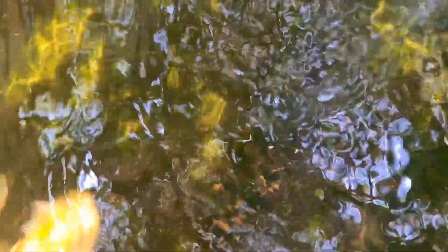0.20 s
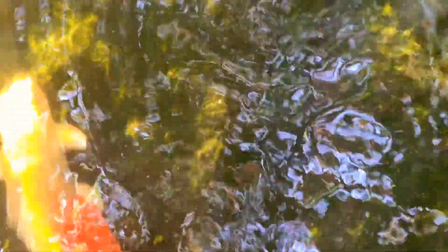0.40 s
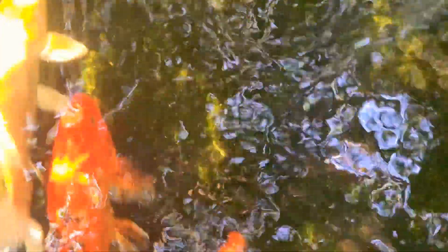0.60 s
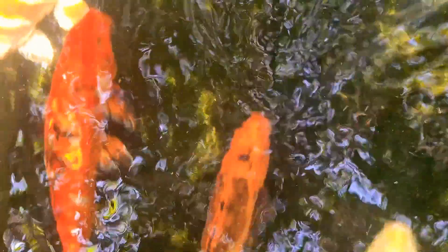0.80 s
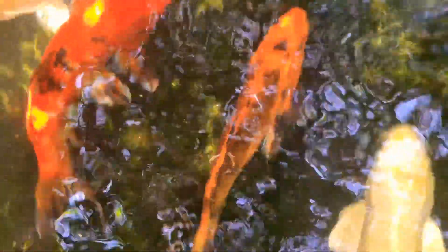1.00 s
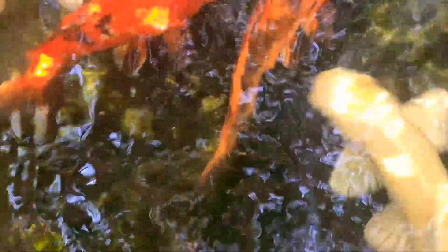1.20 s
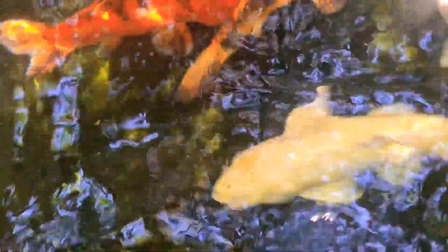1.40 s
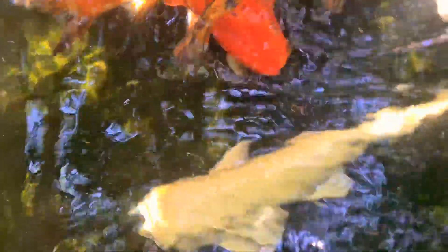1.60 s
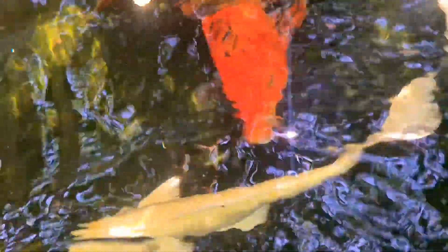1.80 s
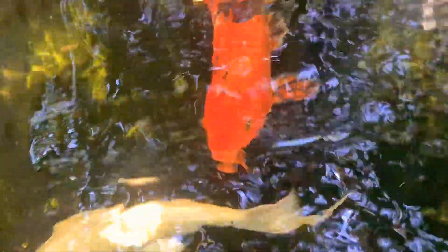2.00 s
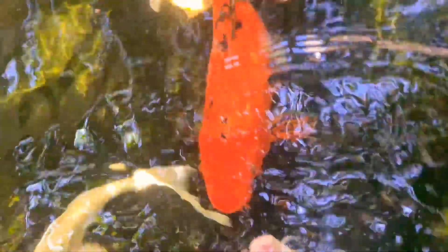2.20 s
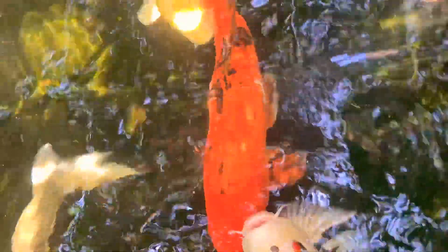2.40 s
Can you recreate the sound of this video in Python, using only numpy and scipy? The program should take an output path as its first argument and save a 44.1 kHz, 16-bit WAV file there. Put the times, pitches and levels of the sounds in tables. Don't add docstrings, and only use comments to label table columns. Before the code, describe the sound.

Feeding fish break a pond surface with a sharp burst of gulps, slaps and froth in the first half second, then soft drips, plinks and fizzing spits over a faint trickle, outdoors, close stereo microphones.

```python
import sys
import numpy as np
from scipy import signal
from scipy.fft import rfft, irfft
from scipy.io import wavfile

SR = 44100
rng = np.random.default_rng(int(sys.argv[2]) if len(sys.argv) > 2 else 0)


def wav_record(signal):
    frames = np.transpose(np.atleast_2d(signal))
    bounded = np.clip(frames, -1, 1)
    quanta = np.round(bounded * 32767).astype(np.int16)
    wavfile.write(sys.argv[1], SR, quanta)


def to_linear_factor(level_db):
    exponent = np.asarray(level_db, float) / 20
    return 10 ** exponent


N = 110250

FAR_LAG_S = 12.0 / 44100
GULP_WOBBLE_DB, GRAIN_DB = 1.3, 2.3


def rms_one(x):
    return x / np.sqrt(np.mean(x ** 2) + 1e-20)


def at_hz(points, hz):
    points = np.array(points)
    return np.interp(np.log(hz), np.log(points[:, 0] + 1e-9), points[:, 1])


def drift(rate_hz):
    r = np.exp(-2 * np.pi * rate_hz * 40 / SR)
    white = rng.standard_normal(N // 40 + 2002)
    slow = rms_one(signal.lfilter([1], [1, -2 * r, r * r], white)[2000:])
    return np.interp(np.arange(N) / 40, np.arange(len(slow)), slow)


def colour(x, spectrum):
    hz = np.maximum(np.fft.rfftfreq(N, 1 / SR), 1)
    return irfft(rfft(x) * to_linear_factor(at_hz(spectrum, hz)), N)


def split(x, kind, edge_hz):
    return signal.sosfilt(signal.butter(2, edge_hz, kind, fs=SR, output="sos"), x)


def ring(x, hz, width_hz):
    r, turn = np.exp(-np.pi * width_hz / SR), 2 * np.pi * hz / SR
    return signal.lfilter([0, np.sin(turn)], [1, -2 * r * np.cos(turn), r * r], x + 1e-18)


def ears(x, lag_s, pan_db=0):
    later = np.interp(np.arange(N) - lag_s * SR, np.arange(N), x)
    return np.array([x * to_linear_factor(pan_db), later * to_linear_factor(-pan_db)])


def add(out, start_s, x):
    i = max(int(start_s * SR), 0)
    out[i:i + len(x)] += x[:N - i]


def pocket(length_s, first_hz, last_hz, rise, fall, bend=1):
    u = np.linspace(0, 1, max(int(length_s * SR), 8))
    shape = u ** rise * (1 - u) ** fall
    hz = first_hz * (last_hz / first_hz) ** u ** bend
    return shape / shape.max() * np.sin(2 * np.pi * np.cumsum(hz) / SR)


def bubbles(per_s, low_hz, high_hz, cycles, spread_db):
    sizes = to_linear_factor(spread_db * np.minimum(rng.exponential(1, N), 4)) * rng.choice([-1, 1], N)
    births = sizes * (rng.random(N) < per_s / SR)
    pitch = rng.integers(0, 24, N)
    out = np.zeros(N)
    for k, hz in enumerate(np.geomspace(low_hz, high_hz, num=24)):
        out += ring(births * (pitch == k), hz, 1.6 * hz / cycles)
    return rms_one(out)


def gulps():
    # start_s, length_s, first_hz, last_hz, peak level_db
    gulp_events = [(1.874, 0.017, 640, 1100, -43.5), (0.1182, 0.0052, 1340, 1300, -22),
                   (.1200, 0.0022, 2440, 2900, -28), (0.12, 0.014, 1270, 1500, -36.5),
                   (0.12, 0.016, 900, 1020, -41), (0.1993, 0.037, 760, 798, -24.5),
                   (0.2072, 0.0031, 1200, 1200, -15.5), (0.22, 0.021, 880, 1290, -30.5),
                   (0.21, 0.0051, 1530, 1550, -22.5), (0.24, 0.018, 1380, 2300, -25),
                   (0.258, 0.011, 400, 317, -34.5), (0.3115, 0.0016, 770, 1000, -17),
                   (0.31, 0.01575, 929, 622, -8.5), (0.31, 0.0068, 1700, 1700, -27),
                   (0.33, 0.004, 870, 600, -20.5), (0.331, 0.018, 462, 525, -27),
                   (.337, 0.006, 860, 920, -32), (0.36, 0.022, 223, 166, -39.5),
                   (0.793, 0.053, 287, 324, -50.5), (0.434, 0.018, 690, 680, -38),
                   (0.45, 0.044, 318, 465, -28), (0.462, 0.0297, 633, 1560, -33),
                   (0.4515, 0.01, 1700, 2000, -37), (.484, .022, 1500, 2300, -37.5),
                   (.503, .01, 2280, 2370, -40), (0.489, 0.0274, 760, 1050, -38.5),
                   (.508, .014, 940, 560, -39.5), (.533, 0.032, 440, 690, -40),
                   (0.56, 0.015, 918, 1240, -27), (0.57, 0.023, 1240, 1130, -43),
                   (0.8735, 0.0226, 595, 1100, -35.5), (0.93, 0.032, 680, 1250, -51),
                   (.849, .006, 690, 870, -44), (.858, 0.009, 735, 600, -43),
                   (0.886, 0.013, 1310, 1340, -44.5)]
    out, t = np.zeros(N), np.arange(400) / SR
    white = rng.standard_normal((len(gulp_events), len(t)))
    cracks = signal.lfilter([.4, -.3], [1, -1.5, .6], white) * to_linear_factor(-60 * t / .012)
    for (start_s, length_s, first_hz, last_hz, level_db), crack in zip(gulp_events, cracks):
        add(out, start_s, to_linear_factor(level_db) * pocket(length_s, first_hz, last_hz, .35, 1.4, bend=1.2))
        add(out, start_s + 0.00104, to_linear_factor(level_db - 9) * crack)
    return out * to_linear_factor(GULP_WOBBLE_DB * drift(118))


def thrash():
    # start_s, length_s, level_db
    bouts = [
        (0.091, 0.12, -49.5),
        (0.197, 0.08, -30.5),
        (0.261, 0.19, -46),
        (0.444, 0.083, -46),
        (0.479, 0.051, -40),
        (0.497, 0.22, -50.5),
        (0.784, 0.047, -55.5),
        (0.843, 0.11, -52),
        (2.235, 0.12, -63),
        (2.392, 0.23, -69),
    ]
    effort = np.zeros(N)
    for start_s, length_s, level_db in bouts:
        u = np.linspace(0, 1, int(length_s * SR))
        add(effort, start_s, 2 * to_linear_factor(level_db) * u ** 0.51 * (1 - u) ** 1.31)
    return effort


def churn():
    # pitch_hz, level_db (per Hz)
    froth = [(180, -15), (300, -6), (778, -10.5), (1450, -4.5), (1800, -5), (5000, -13), (6500, -63),
             (11000, -120)]
    fizz = colour(bubbles(4000, 500, 4500, 13.0, GRAIN_DB + .5), froth)
    return thrash() * to_linear_factor(3.5) * rms_one(fizz)


def sprays():
    # start_s, peak level_db, strongest ring pitch_hz, brightness_db
    slaps = [(0.0308, -50.5, 2910, -10), (0.2071, -29.5, 2810, -4), (0.235, -34, 3320, -3.5),
             (0.2422, -35.5, 4210, -5.5), (0.292, -37, 2190, 0.5), (0.3117, -40, 2160, 5.5),
             (0.3279, -33, 4054, -6.5), (0.39, -41.5, 2920, -5), (0.6495, -45, 3390, -2.5),
             (0.7117, -38.5, 2970, -1.5), (0.8335, -63.5, 4800, 12), (0.9235, -45.5, 2910, -0.5),
             (0.9737, -43, 4700, -1), (1.085, -51, 3410, -7.5), (1.1775, -44, 2850, -3.5),
             (1.343, -51.5, 4200, 3.5), (1.3987, -45.5, 4030, 2.5), (1.5664, -41, 3450, -5),
             (1.6593, -42.5, 2540, -1), (1.729, -51.5, 7250, 5.5), (1.8415, -55, 5630, 5),
             (2.041, -49.5, 7930, 5), (2.1038, -43.5, 4920, -0.5), (2.1882, -47, 2950, -2.5),
             (2.2189, -39.5, 11460, 1.5), (2.297, -43, 2360, -5), (2.4619, -48, 2970, -4.5)]
    # pitch_hz, level_db (per Hz)
    hiss_spectrum = [(880, -24), (1500, -12.5), (2000, -10.5), (4080, -11), (5660, -12.5), (11800, -29.5),
                     (16000, -31.5)]
    t60_s, split_hz, shared, churn_hiss_db = 0.12, 4000, 0.093, -10.5
    white = colour(rng.standard_normal((3, N)), hiss_spectrum)
    hiss = shared * ears(white[0], FAR_LAG_S) + (1 - shared) * white[1:]
    hiss = hiss * to_linear_factor(GRAIN_DB * drift(200))
    dull = rms_one(split(hiss, "low", split_hz))
    bright = rms_one(split(hiss, "high", split_hz))

    effort, rings, t = thrash(), np.zeros(N), np.arange(SR // 4) / SR
    low = to_linear_factor(churn_hiss_db) * effort
    high = to_linear_factor(churn_hiss_db - 4) * effort
    for start_s, level_db, hz, bright_db in slaps:
        s = start_s - .001
        shape = to_linear_factor(level_db + 1.5 - 60 * t / t60_s) * np.minimum(t / 0.0023, 1)
        add(low, s, shape * to_linear_factor(-bright_db - 8.5))
        add(high, s, shape * to_linear_factor(bright_db - 7.5))
        bubble = pocket(.012, hz, hz * 0.973, 0.2, 2.2)
        bubble = bubble + 0.58 * pocket(.012, hz * 1.3, hz * 0.88, 0.24, 7.1)
        add(rings, s, to_linear_factor(level_db + 1 - bright_db - 6.0) * bubble)

    dull = .6 * dull + .8 * ears(bubbles(2500, 1500, 6000, 20, GRAIN_DB), FAR_LAG_S)
    bright = rms_one(signal.lfilter([1, -.6], [1], bright))
    return low * dull + high * bright + ears(rings, FAR_LAG_S)


def drips():
    # start_s, peak level_db, pitch_hz, length_s
    drops = [(0.3763, -26, 1406, 0.013), (0.67, -36.5, 1535, 0.018), (0.709, -55, 713, 0.087),
             (0.82, -49.5, 602, 0.032), (0.951, -38.5, 1334, 0.026), (1.004, -46.5, 1310, 0.031),
             (1.14, -44, 1334, 0.029), (1.361, -50.5, 768, 0.032), (1.435, -53, 702, 0.14),
             (1.545, -57.5, 689, 0.092), (1.636, -54.5, 696, 0.041), (1.698, -56, 713, 0.043),
             (1.889, -43, 938, 0.03), (1.964, -49.5, 1304, 0.022), (2.039, -50, 775, 0.022),
             (2.189, -46.5, 1206, 0.041), (2.224, -56.5, 930, 0.079), (2.391, -50.5, 703, 0.044),
             (1.181, -58.5, 789, .05), (1.79, -56, 770, 0.028), (1.831, -60, 700, 0.04),
             (2.194, -50, 1470, 0.022), (2.272, -54, 782, 0.017), (2.302, -52.5, 845, .02),
             (2.333, -58, 700, 0.018), (2.39, -52.5, 1165, 0.017), (2.441, -57, 1060, 0.03),
             (2.467, -48, 1526, 0.032), (1.45, -50, 1443, 0.072), (2.467, -54.5, 730, 0.062)]
    out = np.zeros(N)
    for start_s, level_db, hz, length_s in drops:
        add(out, start_s, to_linear_factor(level_db + 3) * pocket(length_s, hz, hz * 1.08, .3, 2.56))
    return out * to_linear_factor(2 * GULP_WOBBLE_DB * drift(66))


def spits(rows, gain_db, t60_s, width):
    out, t = np.zeros((2, N)), np.arange(SR // 8) / SR
    whites = rng.standard_normal((len(rows), 3, len(t)))
    for (start_s, level_db, hz), white in zip(rows, whites):
        fizz = rms_one(ring(0.44 * white[0] + white[1:], hz, hz * width))
        shape = to_linear_factor(gain_db + level_db - 60 * t / t60_s) * np.minimum(t / 0.00099, 1)
        for ear, x in zip(out, fizz * shape):
            add(ear, start_s - .001, x)
    return out * to_linear_factor(GRAIN_DB * drift(250))


def trickle():
    per_s = 420 * to_linear_factor(1.0 * drift(17))
    return to_linear_factor(-60.5) * bubbles(per_s, 1017, 8430, 28, GRAIN_DB)


def banks(x):
    t60_s, cut_hz = .16, 3500
    t = np.arange(SR // 2) / SR
    tail = rng.standard_normal((2, len(t))) * to_linear_factor(-60 * t / t60_s) * (t > .006)
    tail = signal.lfilter([1], [1, -np.exp(-2 * np.pi * cut_hz / SR)], tail)
    tail = tail / np.sqrt(np.sum(tail ** 2) / 2)
    return to_linear_factor(-26) * signal.fftconvolve(x[None], tail, axes=1)[:, :N]


def pond():
    # pitch_hz, level_db (per Hz)
    bed = [(12, -36), (20, 0), (74, -10), (738, -20), (1000, -21), (2910, -23.5), (5230, -31.5),
           (11800, -32), (16000, -28)]
    # pitch_hz, shared part (0-1)
    likeness = [(30, 1), (200, 0.92), (1000, 0.85), (4000, 0), (14000, 0.2)]
    swell_db, flicker_db = 1.0, 2.6
    out, together = 0, drift(9)
    edges = 20 * 2 ** np.arange(0, 9.8, .5)
    white = rng.standard_normal((2, 3, N))
    for k, (low, high) in enumerate(zip(edges, edges[1:])):
        shared, *own = split(white[k % 2], "band", [low, high])
        hz = np.sqrt(low * high)
        alike = np.clip(at_hz(likeness, hz), 0, 1)
        motion_db = swell_db * together + flicker_db * drift(5.2) + 1.1 * GRAIN_DB * drift(90)
        gain = to_linear_factor(at_hz(bed, hz) + np.clip(hz / 3000, .3, 1) * motion_db)
        both = np.sqrt(alike) * ears(shared, FAR_LAG_S, -1.5 * (hz < 100))
        out = out + gain * (both + np.sqrt(1 - alike) * np.array(own))
    return to_linear_factor(-53.5) * rms_one(out)


def hums():
    white = rng.standard_normal((4, N))
    rumble = ears(white[0], 0, -1.0) + .55 * white[2:]
    rumble = to_linear_factor(-55) * rms_one(ring(rumble, 77.3, 15.4))
    hollow_hz, hollow_width_hz = 706, 31
    hollow = ring(ring(white[1], hollow_hz, hollow_width_hz), hollow_hz, hollow_width_hz)
    hollow = to_linear_factor(-72 + 0.7 * drift(17)) * rms_one(hollow)
    return rumble + ears(hollow, FAR_LAG_S, -1.095)


def scene():
    # start_s, peak level_db, centre pitch_hz
    spit_events = [(0.6126, -48, 6010), (0.6348, -48, 7000), (0.669, -37.5, 6400), (0.772, -50, 9000),
                   (0.8327, -49.5, 12100), (0.9206, -49, 11500), (0.9757, -41.5, 10200),
                   (1.0395, -45, 8900), (1.0774, -42.5, 7050), (1.097, -41.5, 8360), (1.1778, -46, 6160),
                   (1.2222, -42, 6400), (1.3452, -48.5, 8900), (1.3968, -44.5, 10700), (1.4476, -51, 5100),
                   (1.5044, -47, 5130), (1.5404, -50.5, 12000), (1.5568, -45.5, 9700), (1.5923, -45, 6530),
                   (1.627, -49, 5800), (1.6587, -40.5, 11200), (1.7293, -44, 7700), (1.8428, -56.5, 5740),
                   (2.04, -44, 8200), (2.105, -40, 5140), (2.151, -46, 6740), (2.2977, -50.5, 5900),
                   (2.3318, -52.5, 11950), (2.46, -50.5, 11700)]
    # start_s, peak level_db, centre pitch_hz
    plink_events = [(0.5881, -43, 1970), (0.7701, -45.5, 3050), (1.073, -44, 2270), (1.1248, -40, 2550),
                    (1.2067, -55.5, 2890), (1.2535, -43, 3000), (1.3862, -58, 3010), (1.4077, -47.5, 3600),
                    (1.4441, -47, 1960), (1.488, -45.5, 4280), (1.506, -46.5, 2970), (1.5489, -42, 3100),
                    (1.8233, -48, 2060), (1.8761, -42.5, 1820), (2.0078, -44, 3980), (2.0348, -48, 2740),
                    (2.2463, -45, 3270), (2.2717, -46, 2200), (2.3905, -46, 3200)]
    near = gulps() + churn()
    far = drips() + trickle()
    spray = sprays()
    out = ears(near, 4.0 / 44100, .7) + ears(far, FAR_LAG_S, 1.0) + spray
    out = out + spits(spit_events, -10, t60_s=0.21, width=.1)
    out = out + spits(plink_events, -8, t60_s=0.099, width=.035)
    out = out + banks(near + 2.6 * far + spray[0])
    return out + pond() + hums()


def band_limit(x):
    return signal.sosfilt(signal.butter(12, 16770, fs=SR, output="sos"), x)


def record(dry):
    cut = signal.sosfilt(signal.cheby2(12, 60, 16600, fs=SR, output="sos"), dry)
    mix = signal.lfilter(*signal.butter(2, 30, "high", fs=SR), cut)
    return band_limit(mix)


dry = scene()
out = record(dry)
wav_record(out)
```